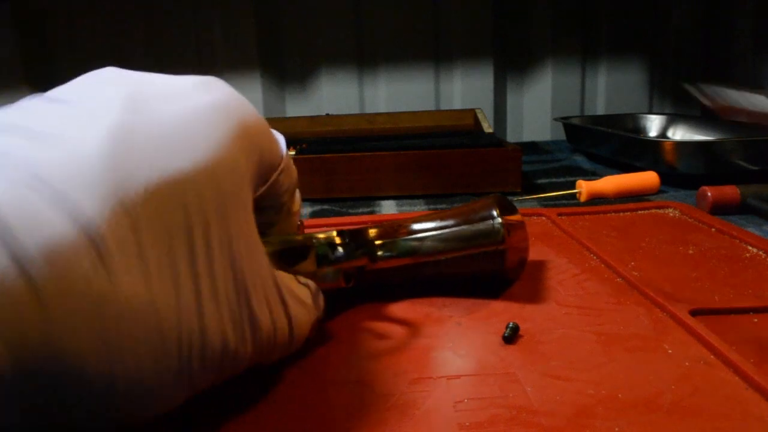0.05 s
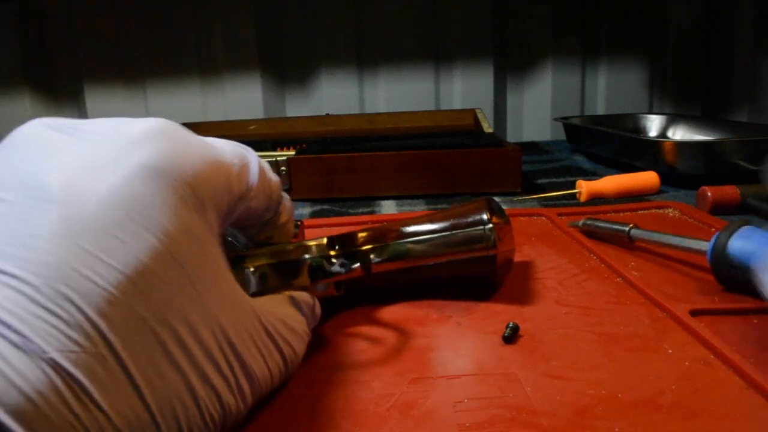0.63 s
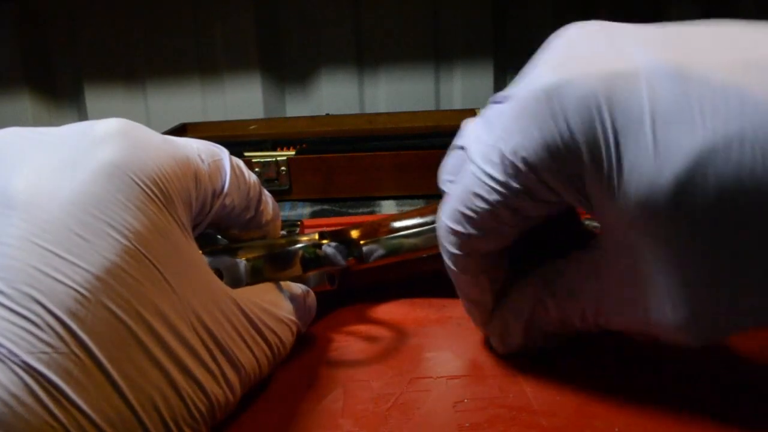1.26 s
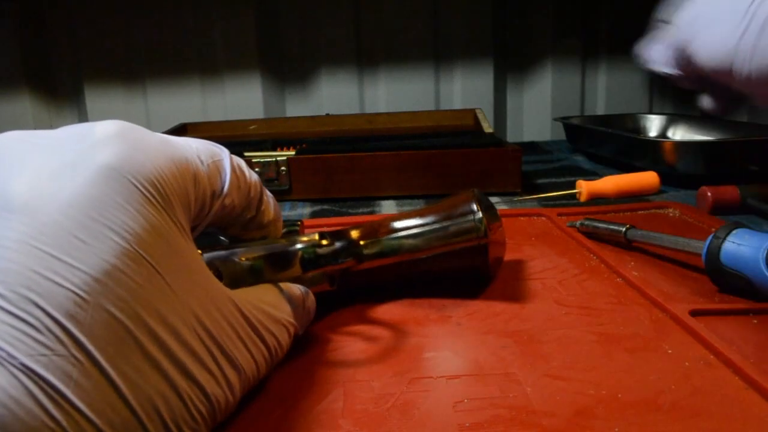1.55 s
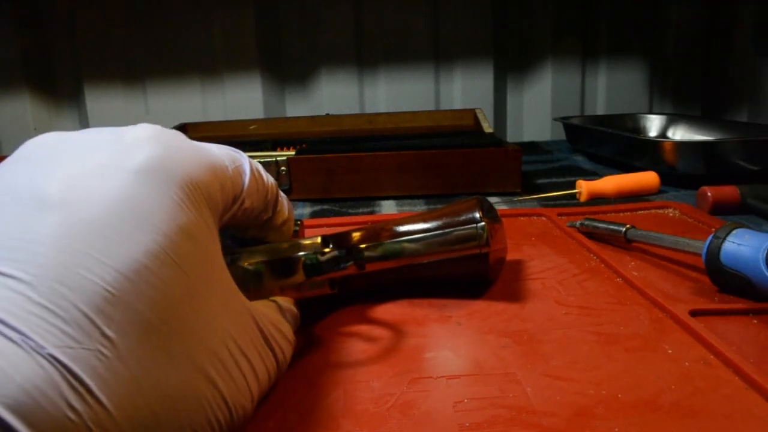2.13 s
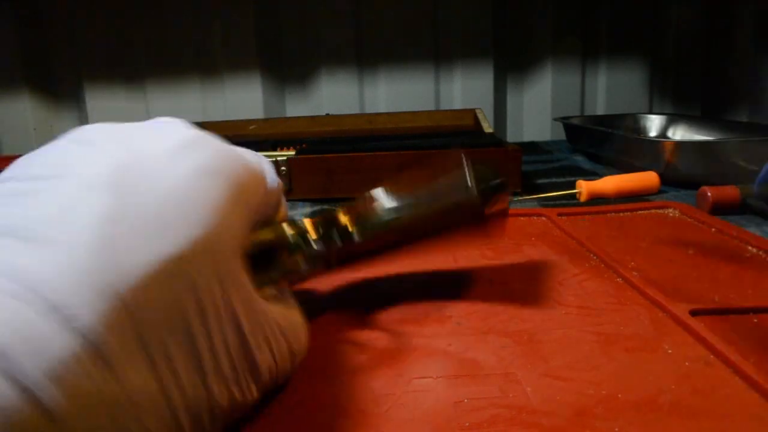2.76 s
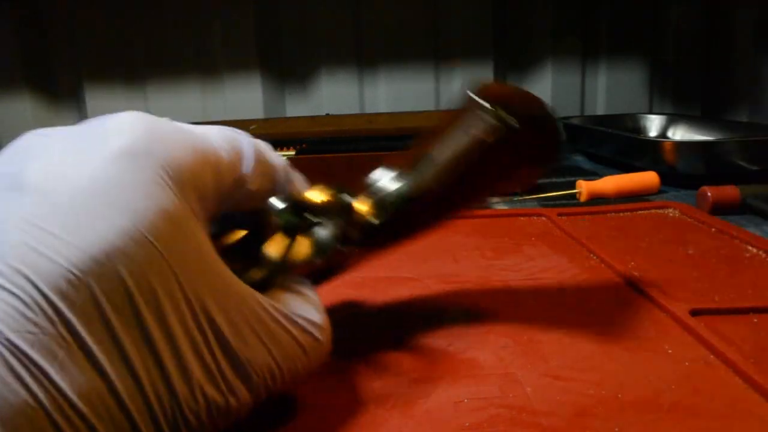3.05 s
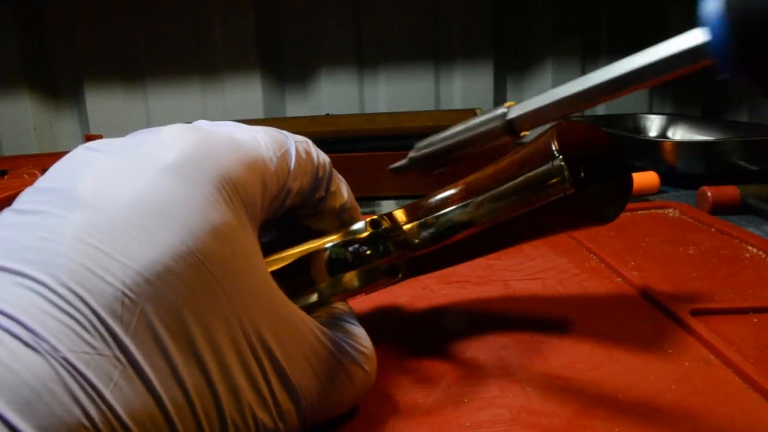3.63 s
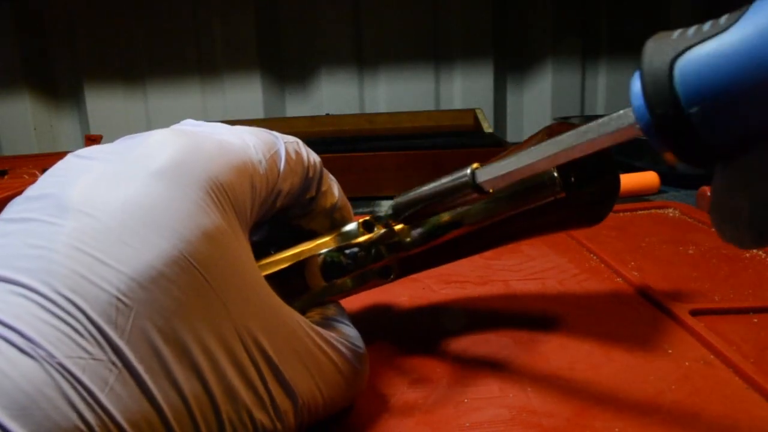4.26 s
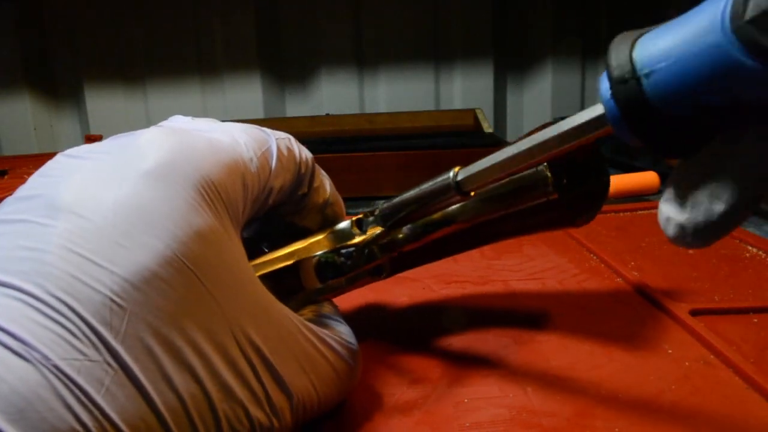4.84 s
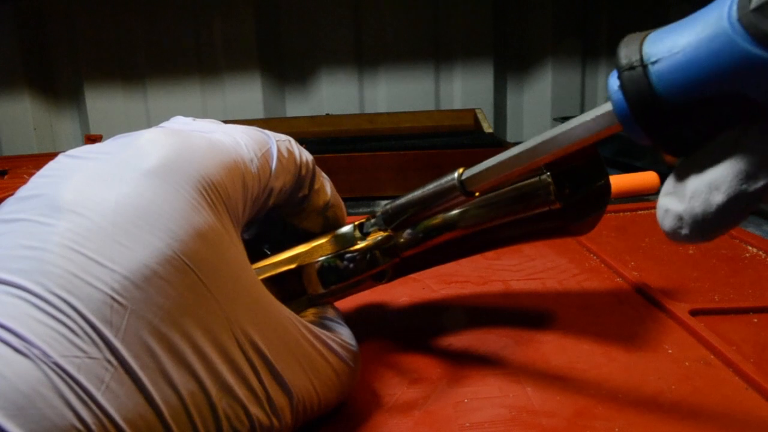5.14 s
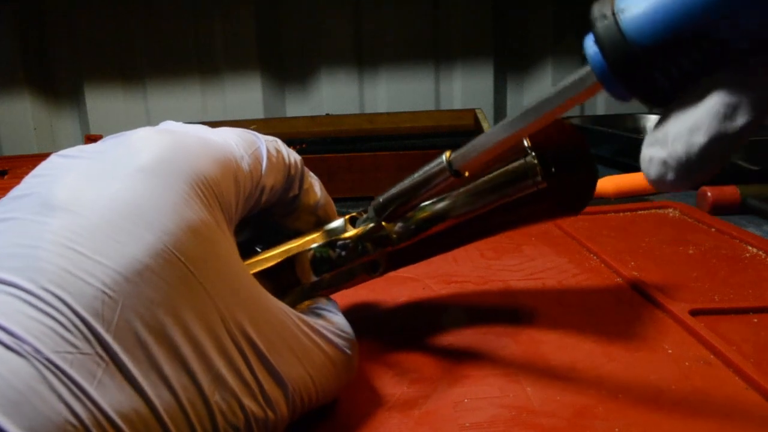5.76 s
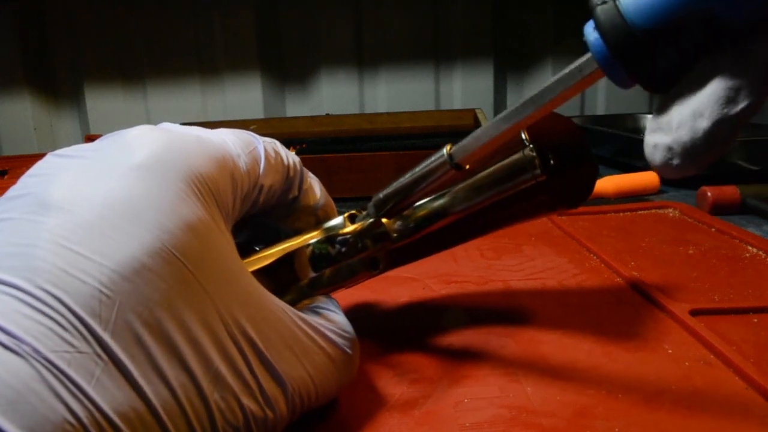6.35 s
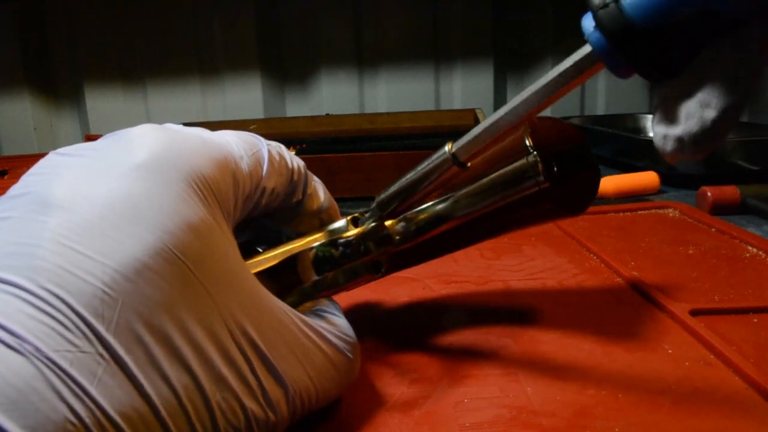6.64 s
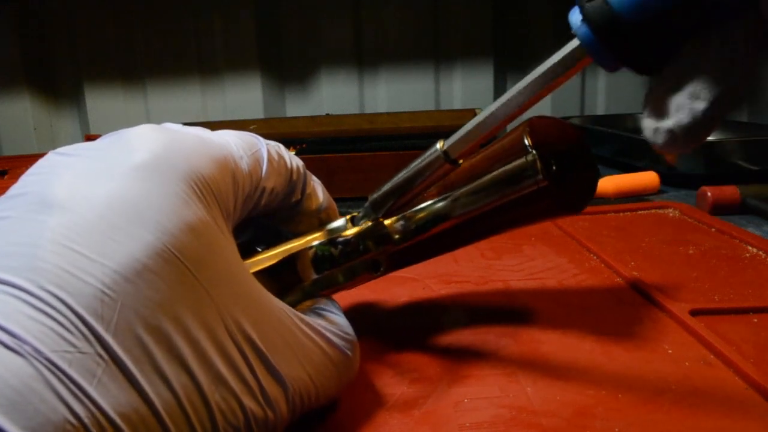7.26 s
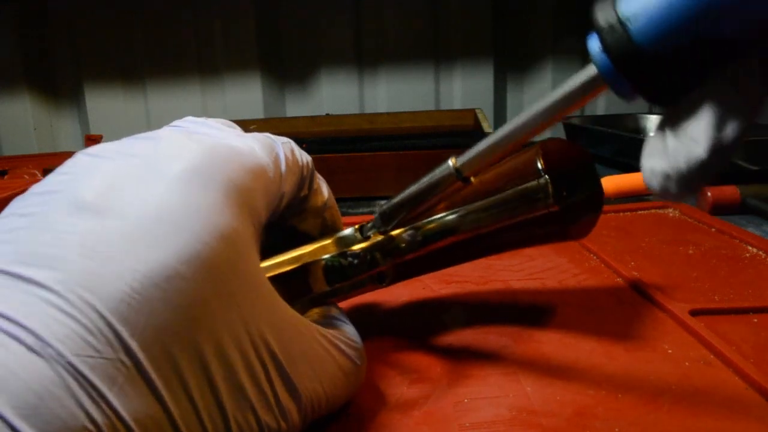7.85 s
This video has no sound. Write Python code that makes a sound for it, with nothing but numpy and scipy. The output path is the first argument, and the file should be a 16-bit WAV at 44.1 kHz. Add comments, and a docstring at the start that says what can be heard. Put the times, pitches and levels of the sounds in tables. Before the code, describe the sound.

A small screw clinks sharply into a metal dish amid soft glove rustle, dull bench knocks and steel clicks in a quiet workshop.

```python
"""Working on a revolver

In a quiet, hard-walled workshop, gloves hiss and crinkle as hands shift on a revolver. A screwdriver
knocks down on the rubber bench mat. A loose screw snaps into a steel parts dish, ringing it loudly
enough to overload the microphone. Then the gun is turned and the screwdriver blade clicks into the
next screw head. Every blow chatters: it bounces a few times, quickly and ever more softly."""
import sys
import numpy as np
from scipy import signal
from scipy.fft import rfft, irfft, next_fast_len
from scipy.io import wavfile
from scipy.ndimage import map_coordinates

SR = 44100
rng = np.random.default_rng(int(sys.argv[2]) if len(sys.argv) > 2 else 0)


def dump(signal):
    """Clip the signal to [-1, 1] and save it as 16-bit WAV at the path in sys.argv[1]."""
    limited = np.clip(np.atleast_2d(signal).T, -1, 1)
    pcm = np.round(limited * 32767).astype(np.int16)
    wavfile.write(sys.argv[1], SR, pcm)


N = 352667


def amp(db):
    """Turn decibels into a number to multiply a sound by."""
    return 10 ** (np.asarray(db) / 20)


def unit(x):
    """Scale a sound to an average (rms) size of 1."""
    return x / np.sqrt(np.mean(x ** 2) + 1e-20)


def along(points, hz):
    """Read between (frequency, value) points, giving each octave equal room."""
    point_hz, values = np.transpose(points)
    return np.interp(np.log(hz + 1), np.log(point_hz + 1), values)


def filtered(x, response):
    """Turn each frequency in x up or down by response(frequency)."""
    size = next_fast_len(len(x) + SR // 4)
    return irfft(rfft(x, size) * response(np.fft.rfftfreq(size, 1 / SR)), size)[:len(x)]


def noise(tone):
    """Steady noise for the whole scene, with the given balance of low and high."""
    return unit(filtered(rng.standard_normal(N), lambda hz: amp(along(tone, hz))))


def wobble(rate):
    """A smooth curve through `rate` random values a second."""
    return map_coordinates(rng.standard_normal(int(N * rate / SR) + 4), [np.arange(N) * rate / SR])


# The low hush of the still room: (frequency [Hz], level [dB])
AIR_TONE = [(12, -42), (20, -19), (69, -8), (179, -4.5), (346, -3), (652, -3), (706, -3.5), (1020, -4.5),
            (1110, -6.5), (1980, -8), (2380, -6), (2640, -5.5), (2860, -10.5), (8010, -23.5),
            (11000, -30.5), (14300, -52), (22000, -120)]
# A narrow band of noise, heard as a whine: (frequency [Hz], level [dB])
WHINE_TONE = [(2000, -52.5), (2480, -19.5), (2590, 5.5), (2700, -12), (2950, -34)]

def background():
    """Steady room noise and a faint, fuzzy whine."""
    return amp(-58.5) * noise(AIR_TONE) + amp(-69) * noise(WHINE_TONE)


def stroke(t, peak_s, half_s):
    """A sliding hand gathers speed, is fastest at peak_s and eases off."""
    return np.exp(-((t - peak_s) / half_s) ** 2)


# The hands shift on the gun: (fastest moment [s], half length [s], level [dB])
HAND_MOVES = [ (.04, 0.29, -60), (1.88, 0.21, -60.5), (2.35, 0.23, -52), (2.88, .2, -59.5), (3.2, 0.5, -67),
              (5.8, 0.14, -67.5), (7.62, .14, -59), (7.93, 0.13, -59), (.7, .2, -55), (1.17, .22, -58),
              (3.68, .06, -63), (4.08, .08, -58), ]
# The grip slips briefly: (time [s], level [dB])
GRIP_SLIPS = [ (.116, -62.5), (.927, -57), (1.064, -54.5), (1.361, -47), (2.636, -49), (3.322, -57),
              (7.561, -57), (7.627, -46.5)]
# The hiss of rubber sliding on steel: (frequency [Hz], level [dB])
HISS_TONE = [(300, -2.5), (800, 6.5), (2000, 0.5), (3300, 5), (5000, 0.5), (7300, 2.5), (7950, -12),
             (8500, 3.5), (9600, 2), (11000, -10)]
# A fold of glove letting go: (frequency [Hz], level [dB])
CRINKLE_TONE = [(1000, -11), (3000, -8), (6000, -3), (9500, -2)]

def gloves(flutter_db=2.45, folds_per_s=45, snap_s=0.0012, crinkle_db=-4, grip_db=-88):
    """Rubber slides on steel with an uneven hiss; small folds snap free, even in a still grip."""
    t = np.arange(N) / SR
    sliding = sum(amp(db) * stroke(t, s, half_s) for s, half_s, db in HAND_MOVES)
    slipping = sum(amp(db) * stroke(t, s, half_s=0.011) for s, db in GRIP_SLIPS)
    hiss = noise(HISS_TONE) * amp(flutter_db * wobble(40))
    folds = rng.random(N) < folds_per_s / SR
    fold_sizes = amp(4.5 * np.minimum(rng.exponential(size=N), 2.5))  # mostly small, a few big
    snaps = signal.lfilter([1], [1, -np.exp(-1 / (snap_s * SR))], folds * fold_sizes)  # each dies away
    crinkle = unit(snaps * noise(CRINKLE_TONE))
    rasp = noise(CRINKLE_TONE)
    return sliding * hiss + slipping * rasp + (amp(crinkle_db) * sliding + amp(grip_db)) * crinkle


def chatter(blows, gap_s, bounces=3, scatter=0.055):
    """Each blow bounces about every gap_s, weakening at a rate of 60 dB per chatter time."""
    contacts = []
    for s, db, treble_db, ring_db, chatter_s in blows:
        flights = gap_s * np.exp(scatter * rng.standard_normal(bounces))
        for age in np.cumsum([0, *flights]):
            contacts.append((s + age, db - 60 * age / chatter_s, treble_db, ring_db))
    return contacts


def fade(t, fade_s):
    """A dying sound: it drops 60 dB in its fade time."""
    return amp(-60 * t / fade_s)


def strikes(contacts, notes, crack_tone, crack_db, crack_fade_s, treble_hz, bass_cut_hz, length_s=0.1):
    """Each contact rings an object's notes over a crack of noise; harder ones have more treble."""
    note_hz, note_db, fade_s = np.transpose(notes)
    track, t = np.zeros(N), np.arange(round(length_s * SR)) / SR
    waves = np.sin(2 * np.pi * note_hz[:, None] * t) * fade(t, fade_s[:, None])
    treble_share = lambda hz: 1 / (1 + (treble_hz / (hz + 1)) ** 4)  # 0 when low, 1 when high
    bass_cut = signal.butter(2, bass_cut_hz, "high", fs=SR)  # small objects give off little bass
    unit_start = lambda x: x / np.sqrt(np.mean(x[t < 0.005] ** 2))  # size 1 over the first 5 ms
    attack = 1 - np.exp(-t / 0.00015)
    for s, db, treble_db, ring_db in contacts:
        strengths = amp(note_db + rng.standard_normal(len(notes)) + treble_db * treble_share(note_hz))
        ring = strengths @ waves
        crack_gain = lambda hz: amp(along(crack_tone, hz) + treble_db * treble_share(hz))
        crack = filtered(rng.standard_normal(len(t)), crack_gain) * fade(t, crack_fade_s)
        blow = (amp(ring_db) * unit_start(ring) + amp(crack_db) * unit_start(crack)) * attack
        add(track, s, amp(db) * unit_start(signal.lfilter(*bass_cut, blow)))
    return track


def add(track, start_s, sound):
    """Mix a sound into the track, beginning at start_s."""
    stretch = track[round(start_s * SR):][:len(sound)]
    stretch += sound[:len(stretch)]


# Tool, gun and fingers knock on the mat:
# (time [s], level [dB], treble [dB], ring [dB], chatter time [s])
MAT_KNOCKS = [ (.035, -49.5, -2, -24.5, .006), (.059, -46, 7, 6, .006), (.313, -45.5, 19, -2, .006),
              (.3212, -41, 3, -2.5, 0.13), (.5946, -21.5, 0.5, 7, .006), (.6393, -48, -5, 7, 0.0068),
              (.6442, -28, -18.5, -1, 0.025), (.658, -47, 24, -10, 0.016), (1.0035, -38, 16, 12, 0.0071),
              (1.4355, -46.5, 2, 5, .05), (1.6155, -51, -15, -4, .006), (2.7192, -39, -6, 8.5, 0.005),
              (3.013, -53.5, 12, -5, .006), (3.456, -46, -8, 13, 0.022), (3.731, -48.5, -4.5, -2, .006),
              (4.5195, -38.5, -3, 4, 0.054), (4.6282, -38.5, -7, -15, .006), (7.3415, -40, -11, -7, .015)]
# The notes of the padded bench top: (frequency [Hz], level [dB], fade time [s])
BENCH_NOTES = [(100, -19, 0.12), (480, -48, .03), (690, -17, .03), (937.4, -0.5, .018), (1300, 3.5, 0.011),
               (1590, 0, .009), (1983, -8, .01)]
# The burst of noise in a knock: (frequency [Hz], level [dB])
BENCH_CRACK_TONE = [(80, -5), (350, -15.5), (800, 1.5), (1400, 2.5), (2300, -11.5), (4000, -14.5),
                    (9000, -26.5)]

def mat_knocks():
    """Things bump the bench, and the rubber mat takes the edge off each knock."""
    return amp(-4) * strikes(chatter(MAT_KNOCKS, gap_s=0.0048), BENCH_NOTES, BENCH_CRACK_TONE,
                             crack_db=-2.5, crack_fade_s=0.038, treble_hz=2190, bass_cut_hz=91)


# The screwdriver blade meets the gun:
# (time [s], level [dB], treble [dB], ring [dB], chatter time [s])
BLADE_CLICKS = [ (.9003, -43.5, -38, -21.5, .006), (1.432, -49.5, 8.5, -4, .8),
                (2.5625, -50.5, -23, -8, .006), (2.7285, -45, -25, 11.5, 0.0216),
                (2.744, -29, 11.5, -9, .012), (4.5148, -40, -4.5, 7, 0.076), (4.5572, -34, -8, 14, .006),
                (4.5953, -26.5, 2, 8, .006), (4.6033, -28.5, 2, 2.5, .012), (4.83, -48.5, -11, -4, .006),
                (5.093, -54, -6, 5, .6), (5.6445, -50, 4, -1.5, .006), (5.6524, -25, -6.5, -6.5, .016),
                (6.933, -49, -5, 5, 0.034), (6.948, -39.5, 11, 1, .04), (7.0263, -50.5, -1, 17, .02),
                (7.0552, -48.5, -20, 9, 0.018)]
# The notes of the gun's frame with the blade on it: (frequency [Hz], level [dB], fade time [s])
FRAME_NOTES = [(1856, -20.5, 0.022), (1971, 0, 0.025), (2040, -4, 0.03), (2320, -12.5, 0.03),
               (2720, -13, 0.022), (3690, -11.5, 0.03), (4100, -9.5, .012), (5860, -1, 0.008),
               (7630, -2, .004), (9600, -3.5, 0.0049)]
# The burst of noise in a click: (frequency [Hz], level [dB])
FRAME_CRACK_TONE = [(500, -10), (1200, -14.5), (1800, -0.5), (2450, 5), (3200, -2.5), (4100, 4.5),
                    (4900, -12.5), (5800, 0.5), (6800, -10.5), (7900, -5.5), (9200, -10.5), (10500, -18.5)]

def blade_clicks():
    """Steel clicks on steel, and the gripping hands cut the ringing short."""
    return amp(-0.5) * strikes(chatter(BLADE_CLICKS, gap_s=0.0075), FRAME_NOTES, FRAME_CRACK_TONE,
                               crack_db=1, crack_fade_s=0.017, treble_hz=3254, bass_cut_hz=591)


# The screw lands, hops and settles:
# (time [s], level [dB], treble [dB], ring [dB], chatter time [s])
SCREW_LANDINGS = [ (1.9602, -6, 1, 3.5, 0.18), (2.008, -30, 5.5, -9, 0.056),
                  (2.018, -14.5, 5.5, -9.5, 0.026)]
# The notes of dish and screw ringing together: (frequency [Hz], level [dB], fade time [s])
DISH_NOTES = [(1669, -29.5, 0.46), (3430, -16.5, .016), (3721, 1.5, 0.028), (3680, -24, 0.75),
              (3830, -6, .018), (4150, -13.5, 0.018), (6826.4, -8, 0.028), (6870, -0.5, .027),
              (6895, -29, 0.53), (8830, -17.5, 0.022), (10454, -7, .016)]
# The dish's brief, crowded overtones, played as noise: (frequency [Hz], level [dB])
DISH_CRACK_TONE = [(300, -14), (1500, -4.5), (2800, -6.5), (3800, 3), (5200, -5), (6900, 3), (7900, -1.5),
                   (8700, 0.5), (9800, 1.5), (10500, 3)]

def screw_in_dish():
    """The screw rings the steel dish, and its first landing thumps the bench below."""
    clink = strikes(chatter(SCREW_LANDINGS, gap_s=0.0026), DISH_NOTES, DISH_CRACK_TONE,
                    crack_db=-3, crack_fade_s=0.048, treble_hz=5500, bass_cut_hz=1120, length_s=0.5)
    add(clink, SCREW_LANDINGS[0][0], bench_thump())
    return amp(-0.5) * clink


# The notes of the bench under the dish: (frequency [Hz], level [dB], fade time [s])
THUMP_NOTES = [(125, -45.5, 0.13), (500, -25.5, 0.046), (642, -44, .25), (1050, -33.5, 0.012)]

def bench_thump(rise_s=0.0016):
    """The bench gives a few low notes, and its padding softens their start."""
    t = np.arange(SR // 4) / SR
    ring = sum(amp(db) * fade(t, fade_s) * np.sin(2 * np.pi * hz * t) for hz, db, fade_s in THUMP_NOTES)
    return ring * (1 - np.exp(-t / rise_s))


# Early echoes from walls near the hands: (delay [s], level [dB])
HAND_ECHOES = [(.0051, -13.5), (.0078, -15), (0.0142, -18), (0.0185, -21.5)]
# One bare wall answers the dish: (delay [s], level [dB])
DISH_ECHO = [(.0208, -12)]
# How long sound lingers in the room: (frequency [Hz], fade time [s])
ROOM_FADE = [(100, .4), (700, .55), (2000, 0.69), (3800, 1), (7000, 0.71), (10500, 0.58)]

def workshop(sound, echoes, tail_db, build_s=0.011):
    """Sound arrives directly, then as echoes off the hard walls that blur into a fading tail."""
    hz, t, bands = signal.stft(rng.standard_normal(SR), SR, nperseg=256)
    fading_bands = bands * fade(t, along(ROOM_FADE, hz)[:, None])
    _, tail = signal.istft(fading_bands, SR, nperseg=256)
    tail *= 1 - np.exp(-np.arange(len(tail)) / (build_s * SR))
    response = amp(tail_db) * tail / np.linalg.norm(tail)
    response[0] = 1  # the direct sound
    for delay_s, db in echoes:
        response[round(delay_s * SR)] += amp(db)
    return signal.fftconvolve(sound, response)[:N]


def scene():
    """Mix everything to one channel; the dish stands further back and has its own echo."""
    clink = workshop(screw_in_dish(), DISH_ECHO, tail_db=-12.5)
    clicks = workshop(blade_clicks(), HAND_ECHOES, tail_db=-18)
    knocks = workshop(mat_knocks(), HAND_ECHOES, tail_db=-11.5)
    return (clink + clicks + knocks + gloves() + background())[None]


def record(dry, treble_hz=10300, top_hz=21000):
    """The microphone loses the top treble and overloads, flattening the peaks of the loudest clink."""
    steep_treble_cut = signal.butter(24, treble_hz, fs=SR, output="sos")
    heard = signal.sosfilt(steep_treble_cut, dry[0])
    clipped = np.clip(heard, -1, 1)
    return filtered(clipped, lambda hz: hz < top_hz)[None]


dry = scene()
out = record(dry)
dump(out)
```